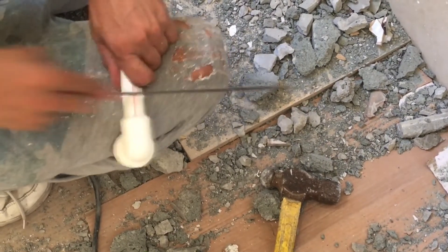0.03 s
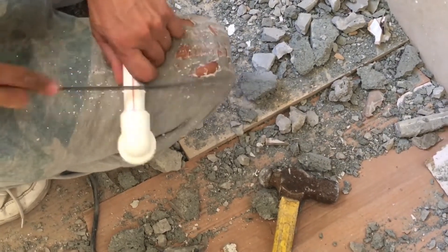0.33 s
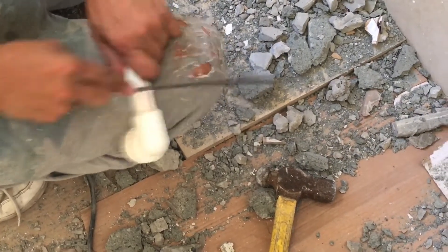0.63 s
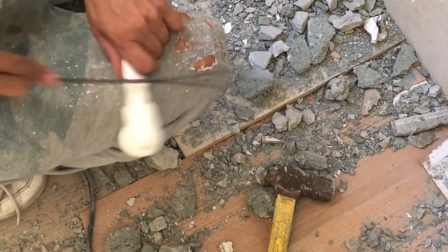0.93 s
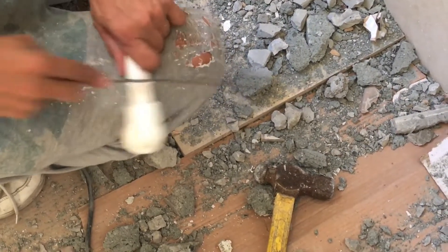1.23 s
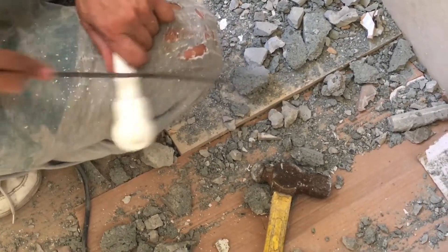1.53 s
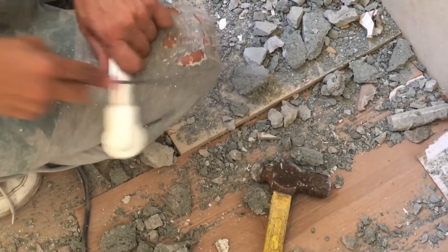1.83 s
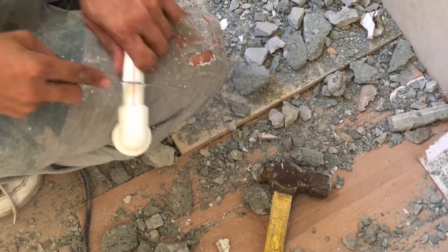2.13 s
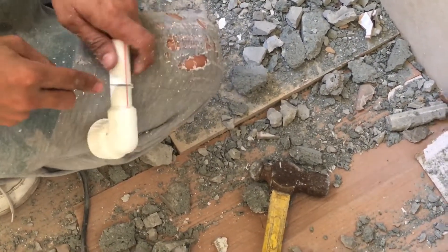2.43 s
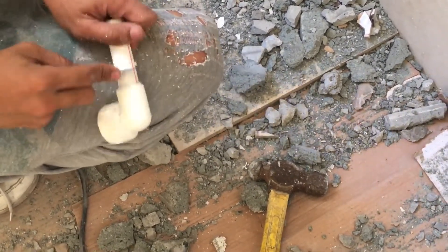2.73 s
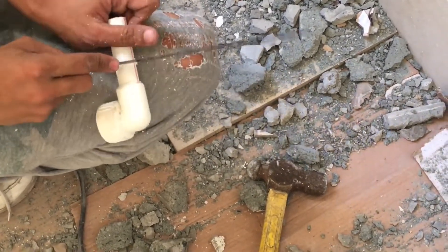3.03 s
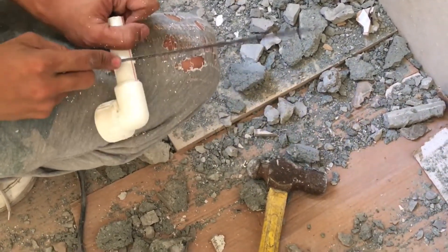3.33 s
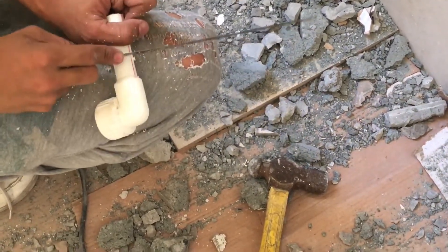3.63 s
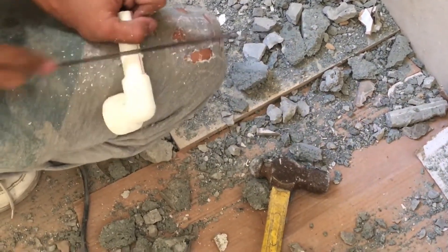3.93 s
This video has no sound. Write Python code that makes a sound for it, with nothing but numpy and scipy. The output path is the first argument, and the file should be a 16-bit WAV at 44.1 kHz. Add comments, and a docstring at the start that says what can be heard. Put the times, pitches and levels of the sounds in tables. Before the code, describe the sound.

A hacksaw blade rasps quickly through a plastic pipe, pauses, then starts again.

```python
"""A bare hacksaw blade rasps to and fro through a small plastic pipe, close by, ten strokes a second.
Its teeth chip the plastic, which makes blade and pipe ring and jolts the pipe against a knee.
The saw stops, is set back into the cut with a short catch and a knock, and starts again.
A distant motor drones over the low rumble of the hard unfinished room.
Something scrapes farther off during the pause."""
import sys
import numpy as np
from scipy import signal
from scipy.fft import rfft, irfft
from scipy.io import wavfile

SR = 44100
rng = np.random.default_rng(int(sys.argv[2]) if len(sys.argv) > 2 else 0)


def transcribe(u):
    """Save the signal u as a 16-bit wav file named by the first command-line argument.

    u: samples, shape (n,) or (channels, n), limited to [-1, 1]; the rate is SR.
    q: integer samples, one column per channel.
    """
    v = np.clip(np.atleast_2d(u).T, -1, 1)
    q = np.round(v * 32767).astype(np.int16)
    wavfile.write(sys.argv[1], SR, q)


N = 176400

# the notes of the pipe when held by its far end: f/Hz, width/Hz, level/dB
LOOSE_PIPE_NOTES = [(1258, 65, 6.5), (1785, 30, -12), (2130, 120, -5.5), (2530, 36, -15), (3570, 50, -18),
                    (3730, 65, -19)]


def undb(db):
    """Turn decibels into a number to multiply by."""
    return 10 ** (np.asarray(db) / 20)


def unit(x):
    """Scale x to an average strength (rms) of 1."""
    return x / np.sqrt(np.mean(x ** 2) + 1e-18)


def freqs(x):
    """The frequencies in the spectrum of x, never below 1 Hz."""
    return np.maximum(np.fft.rfftfreq(len(x), 1 / SR), 1)


def shape(x, gain):
    """Filter x with one gain for each frequency."""
    return irfft(rfft(x) * gain, len(x))


def colour(f, points):
    """A filter curve drawn through points of f/Hz, level/dB."""
    hz, db = np.array(points).T
    return undb(np.interp(np.log(f), np.log(hz), db))


def resonance(f, hz, width):
    """The filter curve of one ringing note: the narrower, the longer it rings."""
    return 1 / (1 + 1j * (f - hz ** 2 / f) / width)


def modes(f, notes):
    """The filter curve of an object that rings at several notes."""
    return sum(undb(db) * resonance(f, hz, width) for hz, width, db in notes)


def above(f, hz):
    """A steep filter curve that passes what lies above hz."""
    return 1 / (1 + (hz / f) ** 8)


def ring(fade_s):
    """A burst of noise that dies away by 60 dB in fade_s."""
    t = np.arange(SR // 2) / SR
    x = rng.standard_normal(len(t)) * np.exp(-np.log(1000) * t / fade_s)
    return x / np.linalg.norm(x)


def add(out, start, x):
    """Mix x into out, beginning at start seconds."""
    i = int(round(start * SR))
    x, i = x[max(-i, 0):], max(i, 0)
    out[i:i + len(x)] += x[:len(out) - i]


def at_level(x, env, db):
    """Scale x to the given level where its loudness curve env is full."""
    return unit(x) * np.sqrt(np.mean(env ** 2)) * undb(db)


def motor_and_rumble():
    """A distant motor drones at a few low notes over dull room noise; the lowest swells now and then."""
    wash_colour = [(20, -6), (45, -2), (70, 2), (110, 1), (200, -2.5), (350, -2), (520, -8.5), (900, -11.5),
                   (1400, -15), (2400, -20.5), (4000, -31), (7000, -39.5), (11000, -41), (15000, -47)]  # broad room noise: f/Hz, level/dB
    motor_notes = [(164.7, 18, -42), (239.9, 10.8, -47), (290.8, 19, -51.5)]  # the motor's droning notes: f/Hz, width/Hz, level/dB
    swells = [(.285, .08, -34.5), (1.435, .09, -34), (1.555, .09, -33), (1.635, .1, -37), (1.975, .1, -36),
              (2.215, .14, -35.5), (2.335, .1, -34), (2.83, 0.0703, -34), (2.885, .07, -35.5),
              (3.17, .11, -33), (3.295, .08, -35), (3.62, .08, -36)]  # swells of the lowest note: middle t/s, length/s, level/dB
    swell_hz, spread_hz = 166, 4.9
    noise = rng.standard_normal(N)
    f = freqs(noise)
    out = undb(-44) * unit(shape(noise, colour(f, wash_colour)))
    for hz, width, db in motor_notes:
        out += undb(db) * unit(shape(rng.standard_normal(N), resonance(f, hz, 2 * width) ** 2))
    for middle, length, db in swells:
        t = np.arange(int(length * SR)) / SR
        hz = swell_hz + spread_hz * rng.standard_normal()
        note = np.sin(2 * np.pi * (hz * t + rng.random()))
        add(out, middle - length / 2, undb(db) * unit(note) * np.sin(np.pi * t / length))
    return out


def far_scrape():
    """A dull scrape elsewhere in the building, smeared by bare walls."""
    scrape_colour = [(300, -20), (700, -7.5), (1150, 4), (1800, -4.5), (2800, -14), (5000, -25),
                     (9000, -30), (15000, -43)]  # the scrape heard from afar: f/Hz, level/dB
    start_s, rise_s, hold_s, fall_db_per_s = 3.261, 0.019, 0.054, 72
    out, t = np.zeros(N), np.arange(SR) / SR
    grit = unit(shape(rng.standard_normal(len(t)), colour(freqs(t), scrape_colour)))
    onset = np.sqrt(np.minimum(t / rise_s, 1))
    fade = undb(-fall_db_per_s * np.maximum(t - rise_s - hold_s, 0))
    add(out, start_s, undb(-41) * grit * onset * fade)
    return out


def handling():
    """Light ticks and the hiss of fingers moving on the pipe."""
    ticks = [(.547, -18, 4000, 9000, -20), (2.183, -28, 5040, 9000, -20), (2.329, -22, 4000, 9000, -20),
             (3.556, -16.5, 1400, 3200, 0), (3.959, -15, 3000, 6000, -6)]  # small taps: t/s, gain/dB, lowest f/Hz, highest f/Hz, pipe ring/dB
    rubs = [(1.962, 0.37, -63), (2.316, 0.093, -60.5), (3.62, .1, -69), (3.78, 0.12, -66)]  # sliding fingers: t/s, length/s, level/dB
    out = np.zeros(N)
    for start, db, low_hz, top_hz, pipe_db in ticks:
        tick = ring(fade_s=0.071) + .5 * ring(fade_s=.012)
        f = freqs(tick)
        band = 1 / (1 + low_hz / (1j * f)) ** 2 / (1 + 1j * f / top_hz)
        pipe = 1 + undb(pipe_db) * modes(f, LOOSE_PIPE_NOTES)
        add(out, start, undb(db) * shape(tick, band * pipe))
    for start, length, db in rubs:
        noise = rng.standard_normal(N)
        hiss = unit(shape(noise, above(freqs(noise), hz=3000)))
        swell = np.sqrt(np.hanning(int(length * SR)))
        add(out, start, undb(db) * hiss[:len(swell)] * swell)
    return out


def knee_thuds():
    """The pipe thuds dully against the knee when a stroke bites hard."""
    jolts = [(.083, -36), (.272, -37), (.926, -35), (1.362, -33.5), (1.426, -31), (1.615, -33.5),
             (3.845, -36)]  # pipe meets knee: t/s, level/dB
    peak_s = 0.0087
    out, t = np.zeros(N), np.arange(SR // 8) / SR
    swell = t / peak_s * np.exp(1 - t / peak_s)
    dull = resonance(freqs(t), hz=166, width=180) ** 2
    for start, db in jolts:
        thud = shape(rng.standard_normal(len(t)), dull) * swell
        add(out, start, at_level(thud, swell, db))
    return out


def stroke_loudness(t, rise, hold, fall_db_per_s):
    """A stroke grows as the teeth bite, holds, then fades as the blade slows."""
    rise_db = -17.5 * np.clip(1 - t / rise, 0, 1)
    fall_db = fall_db_per_s * np.maximum(t - rise - hold, 0)
    return undb(rise_db - fall_db) * np.minimum(2 * t / rise, 1)


def teeth(speed, full_rate_hz, dust_db):
    """Each tooth chips the plastic with a click and a puff of dust; a faster blade clicks more often."""
    jitter, scatter_db = .2, 1.5  # no two teeth are spaced alike or bite alike
    bend_delay_s = .003  # bending waves in the blade arrive this late at 1 kHz, sooner when higher
    chance = rng.standard_normal((SR // 40, 2))
    marks = np.cumsum(np.exp(jitter * chance[:, 0]))  # where the teeth sit along the blade
    travel = np.cumsum(speed) * full_rate_hz / SR
    tooth = np.minimum(np.searchsorted(marks, travel), len(marks) - 1)
    size = undb(scatter_db * np.clip(chance[tooth, 1], -2, 2))
    chips = np.diff(tooth, prepend=0) * size
    smear = np.exp(-4j * np.pi * bend_delay_s * np.sqrt(1000 * freqs(chips)))
    since_chip = travel - np.append(0, marks)[tooth]
    dust = rng.standard_normal(len(speed)) * size * np.exp(-.5 * since_chip)
    return unit(shape(chips - chips.mean(), smear)) + undb(dust_db) * unit(dust)


def blade_set_back():
    """Slow teeth snag and the blade knocks into the cut, ringing the loosely held pipe."""
    # teeth catching: t/s, rise/s, hold/s, level/dB, rasp against pipe ring/dB, full tooth rate/Hz
    catches = [(2.666, .014, .02, -38.5, -6, 450), (3.845, .011, 0.061, -32, 0.5, 300)]
    rasp_colour = [(250, -18), (450, -0.5), (680, 3), (950, -18), (1600, -6.5), (2100, 3.5), (2800, -6),
                   (3900, -7), (5000, -15.5), (7500, -13.5), (10000, -17), (15500, -26)]  # the rasp of slow teeth: f/Hz, level/dB
    knocks = [(2.6979, -4)]  # blade hits the cut: t/s, level/dB
    low_hz, soft_hz, crack_db = 900, 1700, -20  # the knock's two filter edges and its sharp crack
    out, t = np.zeros(N), np.arange(SR // 4) / SR
    f = freqs(t)
    pipe, rasp = modes(f, LOOSE_PIPE_NOTES), colour(f, rasp_colour)
    for start, rise, hold, db, rasp_db, rate_hz in catches:
        env = stroke_loudness(t, rise, hold, fall_db_per_s=512)
        cut = teeth(.5 + .5 * env, rate_hz, dust_db=5) * env
        ringing = unit(shape(cut, pipe / (1 + 1j * f / 6000)))
        rasping = undb(rasp_db) * unit(shape(cut, rasp))
        add(out, start, at_level(ringing + rasping, env, db))
    for start, db in knocks:
        blow = irfft(pipe / (1 + 1j * f / soft_hz) ** 2 / (1 + low_hz / (1j * f)) ** 2, len(t))
        crack = shape(ring(fade_s=.012)[:len(t)], resonance(f, hz=6200, width=3800) ** 2)
        knock = blow / np.linalg.norm(blow) + undb(crack_db) * crack / np.linalg.norm(crack)
        add(out, start, undb(db) * knock)
    return out


def sawing():
    """Each stroke drags the teeth through the cut, rings blade and pipe, and shakes the hand."""
    # saw strokes: t/s, rise/s, hold/s, level before tone change/dB, tilt to the lows/dB, treble/dB
    strokes = [(-.015, 0.014, 0.017, -31.5, -2.5, 2.5), (0.084, 0.013, 0.024, -31.5, -2, 1.5),
               (0.169, 0.012, 0.02, -30, 0, 2.5), (0.27, .015, 0.017, -32.5, -5.5, -0.5),
               (.362, 0.016, 0.025, -30, 2, 2.5), (.452, 0.019, 0.025, -32, -0.5, 1.5),
               (0.542, .022, 0.024, -35, -1.5, 3.5), (0.651, 0.017, 0.021, -34.5, -2.5, 4.5),
               (0.74, 0.012, 0.031, -32, -1.5, -1), (0.825, 0.022, .023, -34, 2, 4.5),
               (0.927, .016, 0.015, -35.5, 1.5, 3), (1.025, 0.039, 0.019, -35.5, 2, 3.5),
               (1.12, .013, 0.029, -35, -6, 1), (1.224, 0.024, 0.031, -40.5, -0.5, 4),
               (1.317, .018, 0.031, -34.5, -1.5, 2), (1.422, .017, 0.023, -34.5, -1, 3.5),
               (1.51, 0.026, 0.026, -35.5, -4.5, 0.5), (1.613, .015, 0.026, -33, -1, -0.5),
               (1.704, .036, .024, -35.5, -3, 2.5), (1.816, 0.027, 0.014, -35.5, -1, 2.5),
               (1.908, 0.015, 0.016, -33.5, -2.5, 0.5), (3.955, 0.025, 0.023, -34.5, 1, 4)]
    rasp_colour = [(200, -9), (500, -4.5), (750, 0), (1200, 0), (1600, -5.5), (2300, 2.5), (3400, -4),
                   (4400, -8.5), (6000, -13), (8300, -11.5), (11000, -17), (15500, -22)]  # the rasp of fast teeth: f/Hz, level/dB
    pipe_notes = [(730.4, 46, 2), (845, 52, -14), (1010, 36, -0.5), (1209, 81, -3), (1275, 30, -5.5),
                  (1328, 25, -8), (1768, 25, -5.5), (2247, 95, -7), (2500, 84, -13), (3007, 10, -1),
                  (3035, 12, -9), (3455, 33, -0.5), (5150, 26, -1), (8300, 58, -6)]  # the ring of the pipe and its elbow: f/Hz, width/Hz, level/dB
    pipe_db, blade_db, shake_db = 3.5, -2.5, -15
    waver_db, waver_hz = 1.7, 107  # the bite wavers within a stroke
    out, t = np.zeros(N), np.arange(SR // 4) / SR
    f = freqs(t)
    body = colour(f, rasp_colour) * (1 + undb(pipe_db) * modes(f, pipe_notes))
    for start, rise, hold, db, low_db, treble_db in strokes:
        env = stroke_loudness(t, rise, hold, fall_db_per_s=329.5)
        waver = unit(shape(rng.standard_normal(len(t)), resonance(f, waver_hz, waver_hz) ** 2))
        bite = env * undb(waver_db * np.clip(waver, -2, 2))
        cut = teeth(speed=.5 + .5 * np.sqrt(env), full_rate_hz=849.4, dust_db=-1) * bite
        blade = signal.fftconvolve(cut, ring(fade_s=0.043))[:len(t)]  # a new ring on every stroke
        cut = cut + undb(blade_db) * blade
        tone = undb(low_db * (0.5 - above(f, hz=1750)) + treble_db * above(f, hz=4800))
        rasp = shape(at_level(shape(cut, body), env, db), tone)
        shake = shape(cut, resonance(f, hz=287, width=254) ** 2)
        add(out, start, rasp + at_level(shake, env, db + shake_db))
    return out


def scene():
    """The close work and its faint echo from the walls, over the sounds of the building."""
    close = sawing() + knee_thuds() + blade_set_back() + handling()
    echo = undb(-22.5) * signal.fftconvolve(close, ring(fade_s=0.73))[:N]
    return (close + echo + far_scrape() + motor_and_rumble())[None]


def record(dry):
    """Cut away the very highest treble."""
    top_hz = 15700
    return signal.sosfilt(signal.ellip(10, .2, 80, top_hz, fs=SR, output="sos"), dry)


dry = scene()
out = record(dry)
transcribe(out)
```